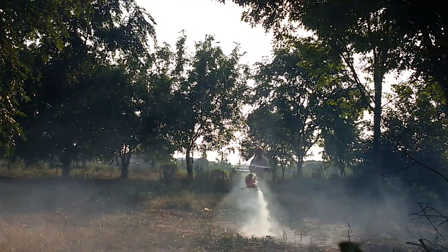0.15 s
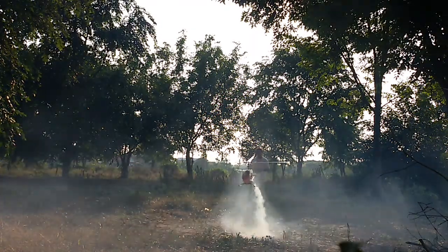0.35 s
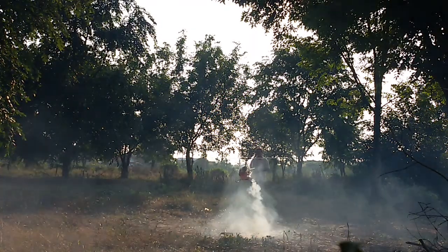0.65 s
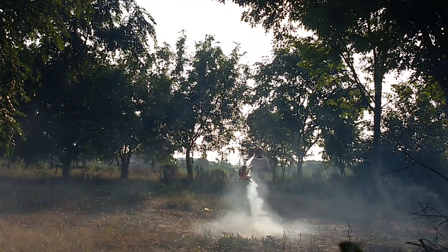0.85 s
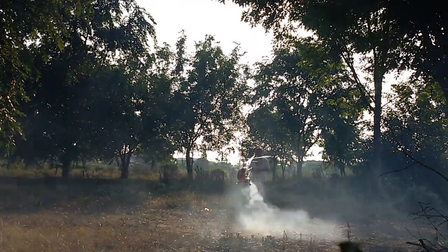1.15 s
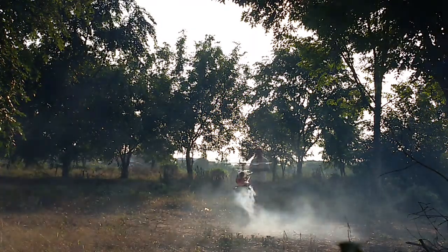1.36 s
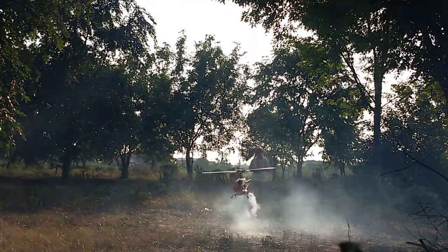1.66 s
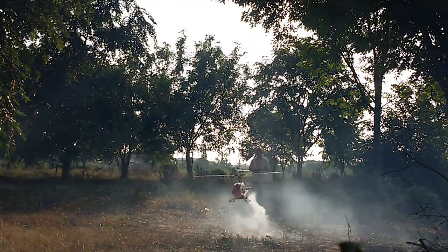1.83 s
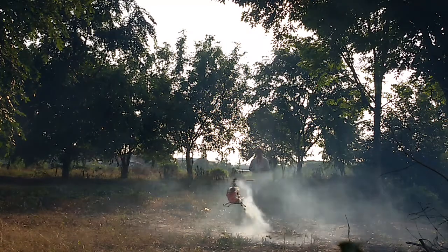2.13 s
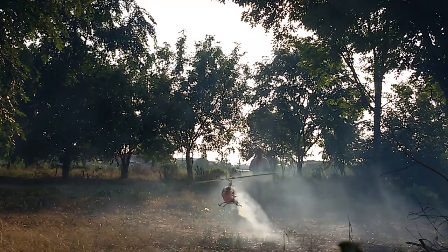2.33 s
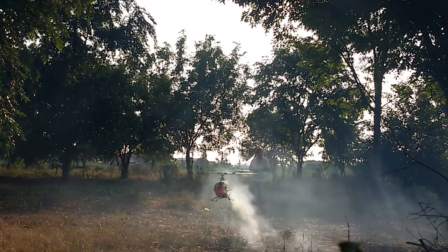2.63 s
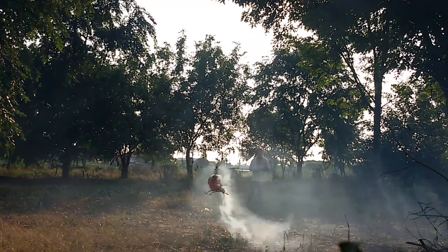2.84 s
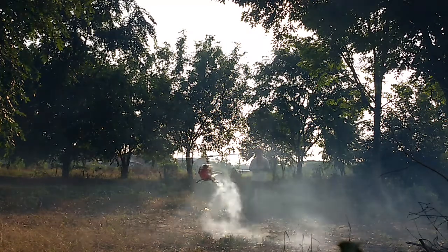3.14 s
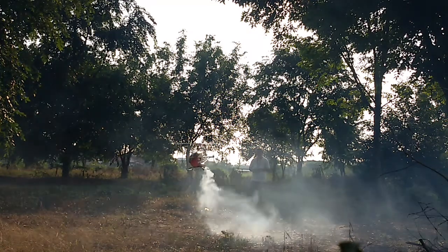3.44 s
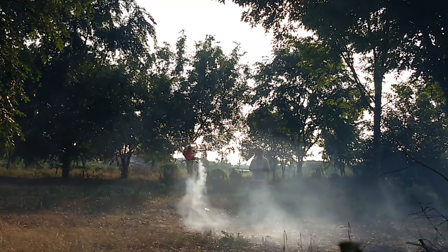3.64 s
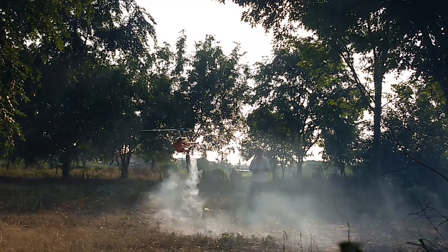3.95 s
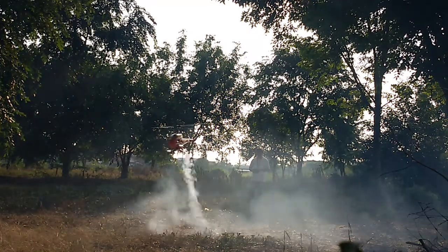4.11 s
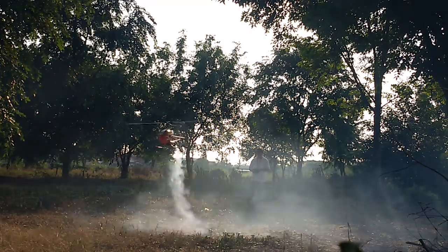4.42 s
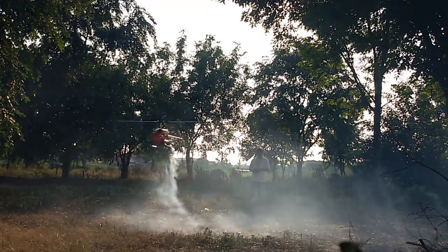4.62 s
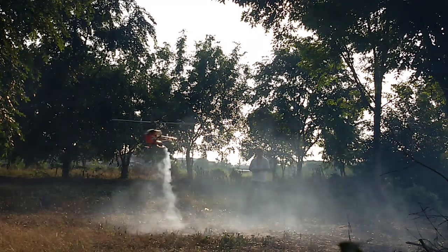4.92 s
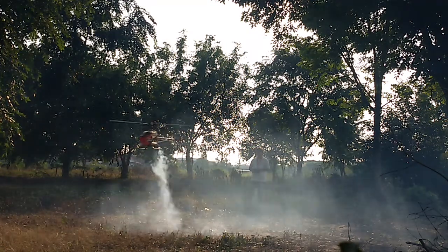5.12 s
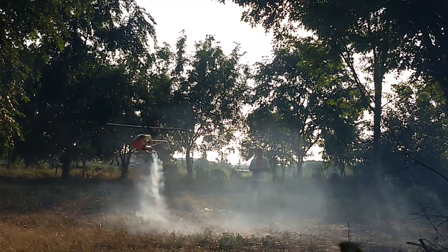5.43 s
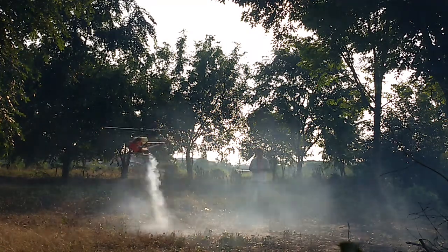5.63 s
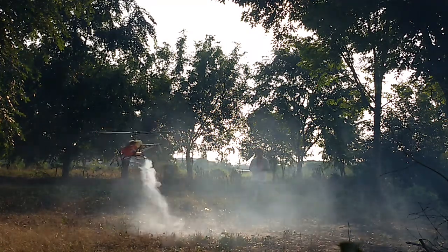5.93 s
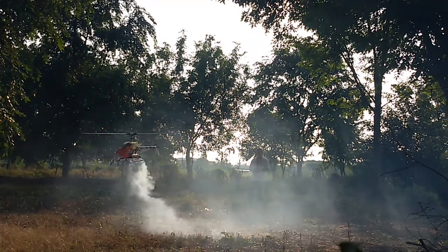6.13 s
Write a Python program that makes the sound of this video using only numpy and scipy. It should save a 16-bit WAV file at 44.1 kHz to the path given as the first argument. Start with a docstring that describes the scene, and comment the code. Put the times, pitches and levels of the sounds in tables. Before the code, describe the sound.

A small model helicopter hovers outdoors, its two-stroke engine buzzing at a steady pitch under a high, pulsing rotor hiss.

```python
"""A model helicopter hovers over a grass field, 10 m from a microphone 1.5 m above the ground.
It starts low and side-on: the two-stroke glow engine buzzes and warbles, the geared-down rotor hisses,
and the blades whistle in Doppler chirps. Near 1.2 s the nose swings toward the microphone, then away,
and the muffler's whine flares. From 3 s it climbs, side-on, and its ground echo sweeps notches down
through the exhaust. Toward the end the rotor pulls harder and the rich engine keeps four-stroking."""
import sys
import numpy as np
from scipy import signal
from scipy.fft import rfft, irfft, next_fast_len
from scipy.io import wavfile
from scipy.ndimage import uniform_filter1d, map_coordinates

SR = 44100
rng = np.random.default_rng(int(sys.argv[2]) if len(sys.argv) > 2 else 0)


def dump_mix(stems):
    """Bounce the given channels to the path in sys.argv[1] as a 16-bit WAV at rate SR."""
    frames = np.atleast_2d(stems).T  # one column per channel
    limited = np.clip(frames, -1, 1)  # hard clip at full scale
    pcm = np.round(limited * 32767).astype(np.int16)
    wavfile.write(sys.argv[1], SR, pcm)


N = 276507

# how it faces the microphone: (time [s], heading [0 nose-on, 1 slanted, 2 and above side-on])
HEADING = [(0, 2.24), (1.2, 0.5), (1.9, 1.9), (2.7, 1.65), (3.1, 2), (4.3, 2), (6.27, 3.4)]
# flight path: (time [s], height above the field [m])
HEIGHT = [(0, 0.66), (.65, 0.76), (1.2, 0.83), (1.7, 0.65), (2.3, 0.61), (2.7, 0.68), (3.0, 0.77),
          (3.5, 0.97), (4.2, 1.233), (4.9, 1.284), (5.7, 1.19), (6.27, 1.14)]


def exhaust(crank, gas_db=-23, honk_db=5, honk_hz=850, honk_width_hz=420):
    """Firings and puffs of gas ring the pipe, whose low honk is beamed forward."""
    # the pipe's resonances: (frequency [Hz], gain [dB])
    pipe_colour = [(370, -32), (470, -30), (615, -6.5), (820, -9.5), (1025, -9), (1230, -2.5), (1435, -3),
                   (1640, -2), (1845, 0), (2050, 1), (2255, -5), (2460, -12.5), (2665, -23), (2870, -15),
                   (3030, -7.5), (3300, -13), (3650, -10.5), (4150, -7.5), (5000, -14), (8000, -23)]
    # escaping gas: (frequency [Hz], level [dB])
    gas_colour = [(600, -7), (1300, 16.5), (2200, 20.5), (3000, -22), (6000, -28.5)]
    # the rasp: (nose-on [dB], slanted [dB], side-on [dB], growth with thrust [dB/dB])
    rasp_levels = (-29, -23.5, -25, 0.68)
    puffs = amp(gas_db) * unit(noise(gas_colour) * lobe(crank - .15, 0.19))
    drive = dispersed(unit(firings(crank, drift_s=18e-6))) + puffs
    pipe = coloured(drive, pipe_colour)
    honk = filtered(pipe, lambda hz: np.exp(-((hz - honk_hz) / honk_width_hz) ** 2))
    nose_on = np.interp(curves(HEADING)[0], [1, 1.9], [1, 0])
    return shimmer(amp(level(rasp_levels)) * (pipe + (amp(honk_db * nose_on) - 1) * honk))


def firings(crank, drift_s, scatter=.32, surge=.09, late_s=24e-6):
    """One pulse a turn; strong and weak ones alternate, more so in a stumble, and weak ones come late."""
    turn = np.arange(1, int(crank[-1]))
    at = np.interp(turn, crank, np.arange(N))
    index = at.astype(int)
    strength_jitter, time_jitter = scatter * rng.standard_normal((len(turn), 2)).T
    alternation = (-1) ** turn * wobble(38)[index]
    swing = (.7 + 0.18 * stumbling()[index]) * (alternation + strength_jitter)
    # more ragged as the exhaust turns to the microphone
    unevenness = np.interp(curves(HEADING)[0], [1, 2], [.2, .37])
    strength = 1 + unevenness[index] * swing + surge * wobble(55)[index]
    delay_s = drift_s * (wobble(80)[index] + time_jitter) - late_s * swing
    at = np.clip(at + SR * delay_s, 0, N - 2)
    whole, part = at.astype(int), at % 1
    return np.bincount(whole, strength * (1 - part), N) + np.bincount(whole + 1, strength * part, N)


def engine_speed(steady_hz, rotor, shudder_hz=30):
    """Firings a second: the speed hunts, rocks once a rotor turn and shudders with the drive train."""
    shudder = unit(filtered(rng.standard_normal(N), lambda hz: np.exp(-((hz - shudder_hz) / 7) ** 2)))
    rock = np.sin(2 * np.pi * (rotor - 0.26))
    hunt = wobble(14)
    return steady_hz * (1 + 0.00141 * hunt + .0045 * rock + .002 * shudder)


def stumbling():
    """How hard the rich engine four-strokes at each moment."""
    # bouts of four-stroking: (centre time [s], length [s], strength [0-1])
    stumbles = [(0.186, 0.074, 0), (0.546, .11, 0.2), (0.71, 0.067, .55), (1.095, 0.39, 0.8),
                (1.36, 0.11, 0.5), (1.583, 0.24, 0.5), (1.91, 0.29, 0.7), (2.078, 0.086, 0.67),
                (2.21, 0.12, .35), (2.47, .035, 0.3), (2.54, 0.038, 0.54), (2.716, .075, 0.4),
                (2.863, 0.078, 0.3), (3.043, 0.081, 0.3), (3.258, 0.076, 1), (3.52, 0.12, 0.5),
                (3.663, 0.14, 0.43), (3.782, .055, 0.55), (3.947, 0.17, 0.6), (4.308, 0.095, 1),
                (4.455, 0.044, 0.66), (4.576, 0.049, .9), (4.703, 0.095, 0.6), (4.84, 0.17, 1),
                (5.06, 0.11, 1), (5.313, 0.15, 1), (5.55, 0.049, 0.6), (5.687, .1, 0.66), (5.95, 0.15, 1),
                (6.118, .06, 1), (6.245, 0.027, 0.8)]
    t = np.arange(0, N, 32) / SR
    bursts = sum(strength * np.exp(-(2 * (t - s) / length) ** 4) for s, length, strength in stumbles)
    return np.interp(np.arange(N) / SR, t, bursts)


def drone(crank, flutter_db=1.78):
    """The two lowest exhaust tones flutter lightly; each stumble adds a half-rate burble."""
    # low exhaust tones: (time [s], first harmonic [dB], second harmonic [dB])
    tone_levels = [(0, -38.5, -32.5), (.7, -35, -33.5), (1.0, -35, -38.5), (1.4, -29, -32),
                   (1.65, -32.5, -28.5), (1.85, -36.5, -33), (2.35, -36, -32), (2.85, -39, -37),
                   (3.1, -39.5, -42.5), (3.65, -37, -41.5), (4.15, -37, -38), (4.7, -39.5, -40),
                   (5.6, -34.5, -40.5), (6.27, -40, -39.5)]
    # the burble, by multiple of the firing rate: (at 0.5 [dB], at 1.5 [dB], at 2.5 [dB])
    burble_levels = (-38.5, -43, -62)
    tones = sum(amp(db + flutter_db * wobble(34)) * unit(np.sin(2 * np.pi * k * (crank + 0.25)))
                for k, db in enumerate(curves(tone_levels), 1))
    burble = sum(amp(db) * unit(np.sin(2 * np.pi * (k + .5) * crank + 1.5 * wobble(32)))
                 for k, db in enumerate(burble_levels))
    return tones + stumbling() * burble


def muffler(crank, gas_db=-3, beam_db=4.5, beam_heading=1.71, beam_width=0.11):
    """Firings and gas ring the thin can; its whine stands out as it swings past the microphone."""
    # the can's resonance: (frequency over its brightest pitch [ratio], gain [dB])
    resonance = [(.66, -65), (.74, -22), (.87, -11), (.95, 0.5), (1, 3), (1.07, 0), (1.26, -10.5),
                 (2.2, -22.5)]
    # its brightest pitch: (nose-on [Hz], slanted [Hz], side-on [Hz])
    pitches = (4100, 4280, 4090)
    # the whine: (nose-on [dB], slanted [dB], side-on [dB], growth with thrust [dB/dB])
    whine_levels = (-13, -29, -25.5, 0.4)
    heading = curves(HEADING)[0]
    knocks = dispersed(unit(firings(crank, drift_s=24e-6)))
    puffs = amp(gas_db) * unit(rng.standard_normal(N) * lobe(crank - .15, 0.19))
    whine = 0
    for pose, hz in enumerate(pitches):
        share = np.clip(1 - abs(np.clip(heading, 0, 2) - pose), 0, 1)
        whine += share * coloured(knocks + puffs, [(hz * ratio, db) for ratio, db in resonance])
    flare_db = beam_db * np.exp(-((heading - beam_heading) / beam_width) ** 2)
    return amp(level(whine_levels) + flare_db - 4.5) * unit(whine)


def blade_hiss(rotor, split_hz=8800):
    """Air tears off the two blades, swelling as each one advances."""
    # torn air: (frequency [Hz], level [dB])
    hiss_colour = [(2800, -44), (3000, -12), (3600, -13), (4300, -12), (5000, -7.5), (5800, 1.5),
                   (7200, 0.5), (8200, 2), (9200, -5.5), (11800, -6.5), (13200, -6), (14600, -9.5)]
    # below and above the split: (nose-on [dB], slanted [dB], side-on [dB], growth with thrust [dB/dB])
    swish_levels = (-16, -24.5, -23, 0.63)
    fizz_levels = (-24.5, -21.5, -25, 0.35)
    air = noise(hiss_colour)
    low = filtered(air, lambda hz: 1 / (1 + (hz / split_hz) ** 16))
    swish = amp(level(swish_levels) + 2.5) * unit(low)
    fizz = amp(level(fizz_levels) + 3.5) * unit(air - low)
    swell = 1 + 0.41 * lobe(rotor - .78, 1.7) + 0.44 * lobe(rotor - .25, 2.3)
    return unit(swell) * (swish + fizz)


def blade_whistles(rotor, steady_hz, hover_hz=205, roughness_rate=800, lull_db=-24):
    """Edge tones glide with the Doppler shift and beam forward just before a blade comes head-on."""
    # edge tones: (head-on at [turns], unshifted pitch at hover_hz [Hz], speed [Mach],
    # relative level [dB], share of the high whistle's level curve [0-1])
    edge_tones = [(.79, 6650, .2, 3, 0.15), (.81, 10490, .25, -1.5, 0.86), (.3, 7800, .25, -4.5, 0.042),
                  (0.39, 5700, .25, -6.5, 0.65), (0.23, 10200, .23, -7, 0.13)]
    # the low whistle: (time [s], level [dB])
    low_levels = [(0, -26), (1.2, -23), (1.9, -20), (2.85, -17.5), (3.5, -21), (4.6, -15.5), (5.4, -16.5),
                  (6.27, -16.5)]
    # the high whistle catches and fades: (peak time [s], half length [s], peak level [dB])
    squeals = [(.12, 0.47, -9), (2.404, 1, -10), (4.7, 0.46, -14.5)]
    t = np.arange(N) / SR
    swells = sum(amp(db) * np.exp(-((t - s) / half) ** 2) for s, half, db in squeals)
    high_db = 20 * np.log10(np.hypot(swells, amp(lull_db)))
    low_db = curves(low_levels)[0]
    whistles = 0
    for head_on, hz, mach, db, high in edge_tones:
        angle = rotor - head_on
        doppler = 1 / (1 - mach * np.cos(2 * np.pi * angle))
        pitch = hz * steady_hz / hover_hz * doppler * (1 + 0.0067 * wobble(30))
        phase = 2 * np.pi * np.cumsum(pitch) / SR
        tone = unit((2 + wobble(roughness_rate)) * np.cos(phase) + wobble(roughness_rate) * np.sin(phase))
        beam = lobe(angle + 0.11, 8) + 0.44 * lobe(angle - .04, 2.6)
        whistles += amp(db + (1 - high) * low_db + high * high_db - 1.94) * beam * tone
    return whistles


def downwash(lump_db=6):
    """The rotors churn the air into a low, lumpy flutter and a smoother rush, strongest nose-on."""
    # churn and rush: (frequency [Hz], level [dB])
    churn_colour = [(20, -28), (45, -15), (80, -12.5), (125, -2), (175, 3.5), (260, -4.5), (450, 4),
                    (540, -19), (900, -49), (2400, -70)]
    rush_colour = [(200, -75), (550, 12), (900, 12), (2200, 12), (2600, 7), (3100, -14), (9000, -21.5)]
    # their levels: (nose-on [dB], slanted [dB], side-on [dB], growth with thrust [dB/dB])
    churn_levels = (-37, -37.5, -44.5, 1)
    rush_levels = (-14, -54.5, -40, 1.6)
    lumps = unit(amp(lump_db * np.minimum(wobble(16), 1.3)))
    churn = amp(level(churn_levels)) * lumps * noise(churn_colour)
    return churn + amp(level(rush_levels)) * noise(rush_colour)


def tail_rotor(crank, passes_per_firing=.93):
    """The tail blades hum just under the engine note and beat against it."""
    # the hum: (nose-on [dB], slanted [dB], side-on [dB], growth with thrust [dB/dB])
    hum_levels = (-41, -43.5, -46, 0)
    return amp(level(hum_levels)) * unit(np.sin(2 * np.pi * passes_per_firing * crank + wobble(20)))


def dispersed(x, spread_s=0.017, size=8192):
    """Many paths through pipe, frame and grass smear each firing without colouring it."""
    paths = rfft(rng.standard_normal(size) * np.exp(-np.arange(size) / (SR * spread_s)))
    return signal.fftconvolve(x, irfft(paths / abs(paths)))[:N]


def shimmer(x, depth_db=1.7, size=1024):
    """Turbulent air on the way to the microphone makes each pitch region swell and fade on its own."""
    bands = signal.stft(x, nperseg=size)[2]
    eddies = uniform_filter1d(rng.standard_normal(bands.shape), size=5, axis=0)
    eddies = uniform_filter1d(eddies, size=6, axis=1)
    return signal.istft(bands * amp(depth_db * unit(eddies)), nperseg=size)[1][:N]


def over_ground(x, mic_height_m=1.5, distance_m=10, bounce=0.48, grass_hz=3000):
    """A duller echo off the field lags more as the helicopter climbs, so notches sweep downward."""
    detour_m = 2 * curves(HEIGHT)[0] * mic_height_m / distance_m
    lag_s = detour_m / 343  # speed of sound, m/s
    dulled = filtered(x, lambda hz: 1 / (1 + 1j * hz / grass_hz))
    echo = map_coordinates(dulled, [np.arange(N) - SR * lag_s])
    return (x + bounce * echo) / np.hypot(1, bounce)


def hollowed(x, centre_hz=2646, half_width_hz=244, full_m=.62, gone_m=0.93):
    """Close to the ground a band above the exhaust's strongest tones drops out: the sound turns nasal."""
    depth = np.interp(curves(HEIGHT)[0], [full_m, gone_m], [1, 0])
    return x - depth * filtered(x, lambda hz: 1 / (1 + np.abs((hz - centre_hz) / half_width_hz) ** 8))


def level(layer):
    """A layer's relative dB toward the microphone: beamed by heading, growing with thrust."""
    # the rotor's pull: (time [s], thrust over a calm hover [dB])
    thrust = [(0, 1), (.6, 2), (1.05, 0), (1.5, 4.5), (1.85, 1.5), (2.35, -1.6), (2.65, 1), (3.0, -1.5),
              (3.35, 0.5), (3.75, -0.5), (4.45, 4.5), (5.1, 2.5), (5.7, 3.5), (6.15, 4.5)]
    *facing_db, growth = layer
    return np.interp(curves(HEADING)[0], [0, 1, 2], facing_db) + growth * curves(thrust)[0]


def amp(db):
    """Decibels to gain."""
    return 10 ** (np.asarray(db) / 20)


def unit(x):
    """Scaled to rms 1."""
    return x / np.sqrt(np.mean(x ** 2) + 1e-20)


def curves(rows):
    """One value per sample for each column after the time."""
    times, *columns = np.transpose(rows)
    return [np.interp(np.arange(N) / SR, times, column) for column in columns]


def wobble(rate):
    """A smooth random curve of rms 1, rate knots a second."""
    t = np.arange(0, N, 16) / SR
    coarse = map_coordinates(rng.standard_normal(len(t)), [t * rate], mode="wrap")
    return unit(np.interp(np.arange(N) / SR, t, coarse))


def lobe(turns, sharpness):
    """A swell once a turn, 1 at whole turns."""
    return np.exp(sharpness * (np.cos(2 * np.pi * turns) - 1))


def filtered(x, response):
    """x through a frequency response."""
    size = next_fast_len(N + SR // 2)
    return irfft(rfft(x, size) * response(np.fft.rfftfreq(size, 1 / SR)), size)[..., :N]


def coloured(x, spectrum):
    """x shaped by (frequency [Hz], gain [dB]) points on a log axis, at rms 1."""
    points_hz, db = np.transpose(spectrum)
    return unit(filtered(x, lambda hz: amp(np.interp(np.log(hz + 1), np.log(points_hz + 1), db))))


def noise(spectrum):
    """Coloured noise of rms 1."""
    return coloured(rng.standard_normal(N), spectrum)


def scene():
    """The crankshaft drives the rotor through the gear; one microphone feeds both channels."""
    # engine speed: (time [s], firing rate [Hz])
    firing_rate = [(0.0, 196.33), (1.05, 200.36), (1.8, 204.91), (2.95, 206.48), (3.5, 205.66),
                   (3.75, 206.77), (4.5, 208.97), (5.4, 210.32), (6.27, 212.81)]
    gear_ratio = 8.527
    steady_hz = curves(firing_rate)[0]
    rotor = np.cumsum(steady_hz) / SR / gear_ratio  # turns; the heavy rotor evens out the wavering
    crank = np.cumsum(engine_speed(steady_hz, rotor)) / SR
    engine = drone(crank) + over_ground(exhaust(crank)) + muffler(crank)
    blades = blade_hiss(rotor) + blade_whistles(rotor, steady_hz) + tail_rotor(crank)
    return np.tile(hollowed(engine + downwash()) + blades, (2, 1))


def record(dry):
    """The microphone chain rounds off the highest peaks and keeps nothing above its band limit."""
    top_hz, ceiling = 14700, .92
    x = filtered(dry, lambda hz: hz < top_hz)
    rounded = x / (1 + np.abs(x / ceiling) ** 10) ** .1
    return filtered(rounded, lambda hz: hz < top_hz)


dry = scene()
out = record(dry)
dump_mix(out)
```